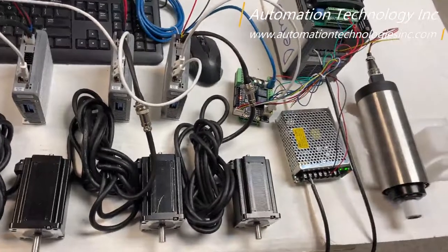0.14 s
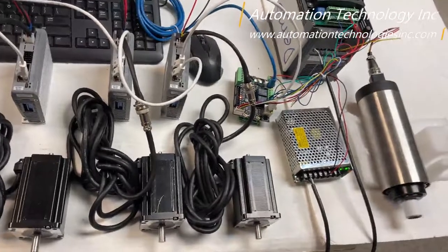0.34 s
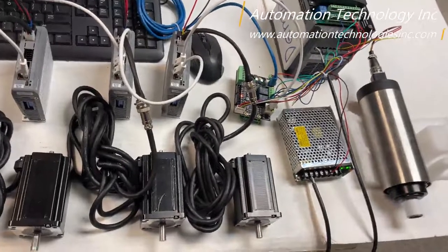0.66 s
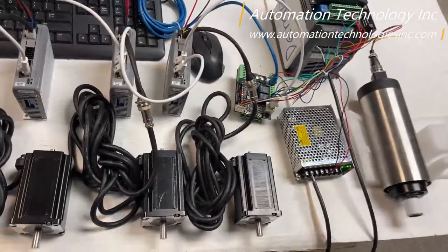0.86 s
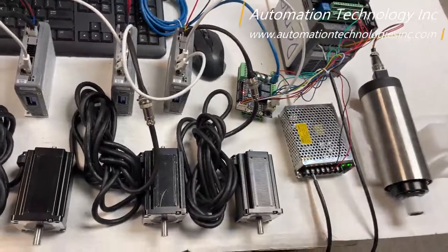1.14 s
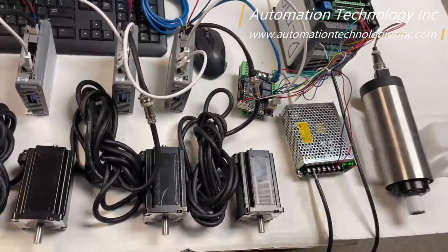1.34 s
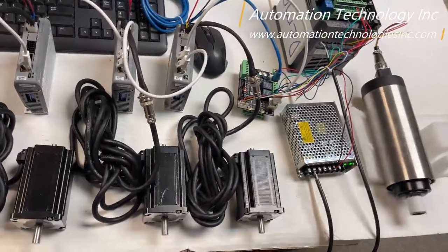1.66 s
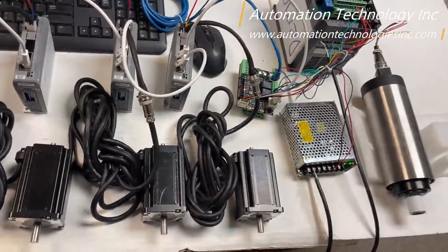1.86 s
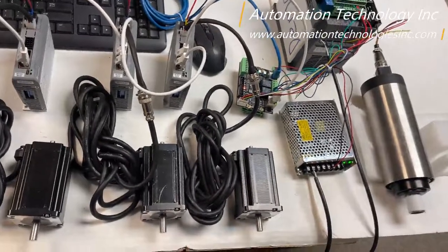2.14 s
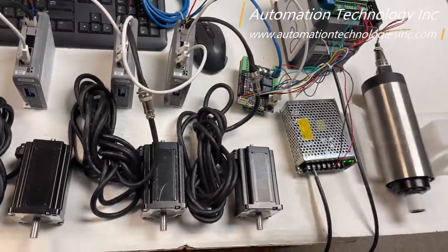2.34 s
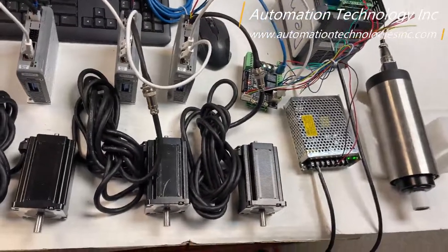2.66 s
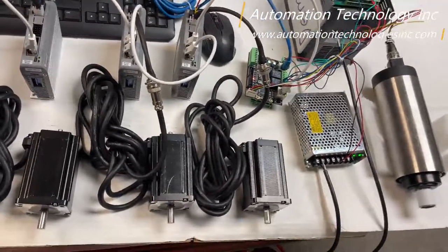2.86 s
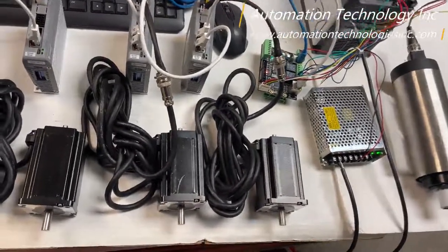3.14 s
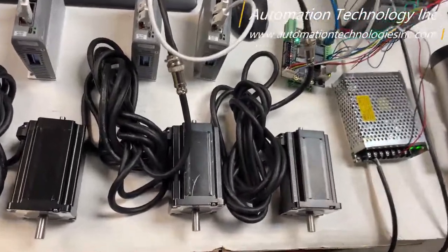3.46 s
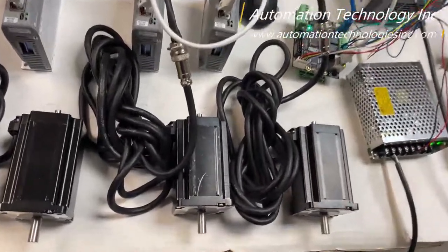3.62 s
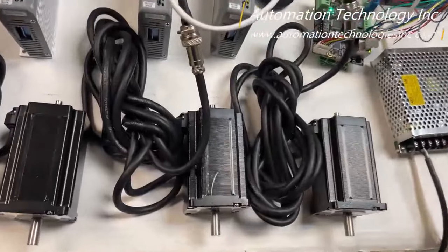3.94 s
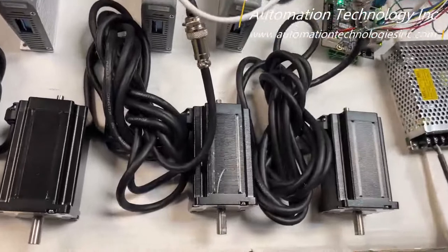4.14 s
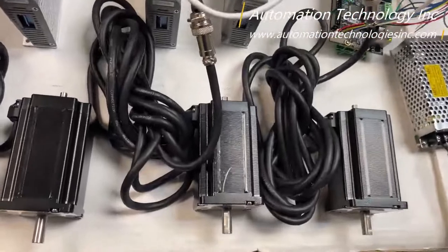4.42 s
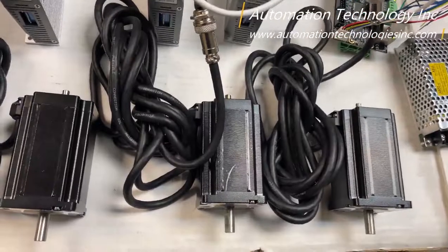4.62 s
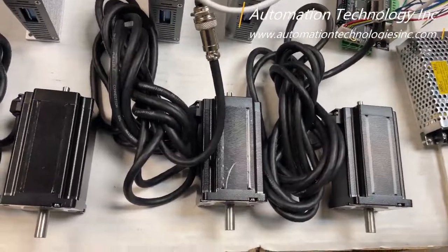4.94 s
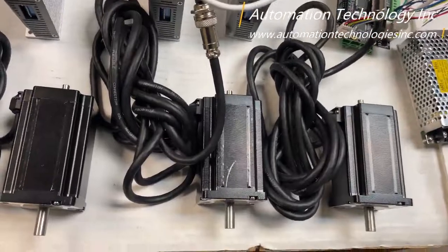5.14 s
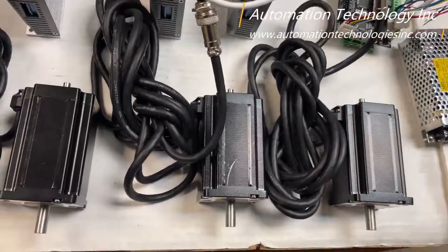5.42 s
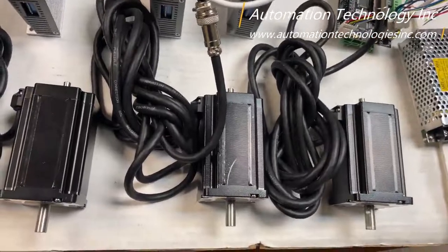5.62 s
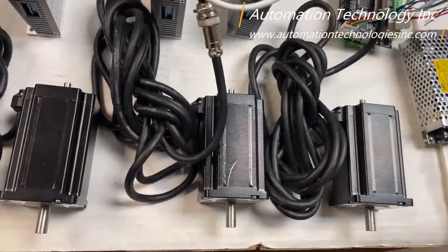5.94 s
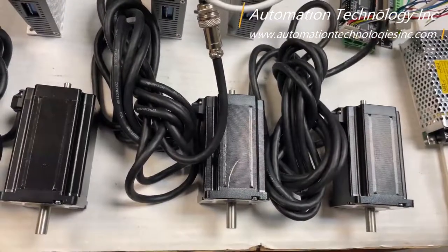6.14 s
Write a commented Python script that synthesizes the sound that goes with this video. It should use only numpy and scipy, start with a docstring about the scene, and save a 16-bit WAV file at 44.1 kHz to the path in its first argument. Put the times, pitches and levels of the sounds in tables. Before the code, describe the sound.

An air-cooled electric spindle motor on a workbench, heard indoors in stereo at close range. At 0 s it is already running fast and finishing its run-up: the hum climbs from about 234 to 254 hertz in roughly half a second, bulging near 0.25 s and shifting from right to left. The slightly raised level sinks and settles by 0.7 s. From there a strong, nearly pure hum around 255 hertz holds, with an octave and higher whine lines, notably near 1.8 kilohertz, fluttering slightly, plus broadband cooling air and fine bearing hiss. A very faint low drone enters around 2.1 s and wavers. From 3 to 4 s the microphone moves closer: the motor swells a little, and a bright vent hiss peaks near 3.7 s and fades. The hum then continues steadily, slightly fuller and more whiny, until it cuts off still running around 6.4 s.

```python
"""Spindle motor on a workbench

An air-cooled spindle motor finishes its run-up and holds about 15000 turns a minute.
Its unbalanced shaft hums through the bench as a sine at the shaft speed; whole multiples of that speed whine.
Blurred sines are the bearings, shaped noise is the cooling air, and a low drone and mains hum stay faint.
A little past halfway the microphone moves closer, which shifts levels, balance and colour."""
import sys
import numpy as np
from scipy import signal
from scipy.fft import rfft, irfft
from scipy.io import wavfile

SR = 44100
rng = np.random.default_rng(int(sys.argv[2]) if len(sys.argv) > 2 else 0)


def persist_wave(psi):
    """Save psi, clipped to +-1, as 16-bit WAV."""
    counts = np.round(np.clip(psi, -1, 1) * 32767).astype(np.int16)
    wavfile.write(sys.argv[1], SR, np.atleast_2d(counts).T)


N = 276948
TIME = np.arange(N) / SR                # s
BIN_HZ = np.arange(N // 2 + 1) * SR / N
SIDE = np.array([[.5], [-.5]])          # left and right port each take half of a difference

START_SPEED, RAMP_PER_S = 233.5, 58.5   # turns/s, turns/s per s
TOP_SPEED, KNEE = 255.1, 2.7            # turns/s: final speed, softness of the levelling off
CREEP, CREEP_S = 1.2, 2.4               # turns/s still missing at the start, time constant in s


def shaft_speed():
    """Ramp and saturation: a steady run-up levels off, then creeps up as the bearings warm (turns/s)."""
    running = TOP_SPEED - CREEP * np.exp(-TIME / CREEP_S)
    ramp = START_SPEED + RAMP_PER_S * TIME
    return running - KNEE * np.logaddexp(0, (running - ramp) / KNEE)   # soft minimum of the two


HUM_DB_PER_SPEED = 0.26                 # growth for each turn/s
CLOSEST_HUM_DB = 2
# the run-up sweeps through a bench resonance, which builds, dies away and shifts the hum right to left
SHAKE_S, SHAKE_BUILD_S, SHAKE_DECAY_S, SHAKE_DB = 0.24, 0.093, 0.17, 4.5
START_PAN_DB, SHIFT_S, SHIFT_TAKES_S = -4.5, 0.32, 0.37


def hum(shaft, speed, near, closest, waver_db=0.11):
    """Unbalance excitation: the shaft shakes the bench once a turn, harder as the speed grows."""
    level_db = blend(-13.5, -12, near)
    settled_pan_db = blend(5.7, 3.5, near)
    lead = blend(0.22, -0.35, near)     # rad
    level_db = level_db + HUM_DB_PER_SPEED * (speed - TOP_SPEED) + CLOSEST_HUM_DB * closest
    level_db = level_db + SHAKE_DB * swell(SHAKE_S, SHAKE_BUILD_S, SHAKE_DECAY_S)
    pan_db = blend(START_PAN_DB, settled_pan_db, ease(SHIFT_S, SHIFT_TAKES_S))
    return tone(shaft, level_db + waver_db * drift(9), pan_db, lead)


# whine lines at the far and the near spot, before resonance and flutter:
# [multiple of shaft speed, level/dB, left-right/dB, left lead/rad]
WHINE_FAR_LINES = [(2, -23, -1, -1.48), (3, -40.5, 2.5, 1.36), (4, -33, 2.5, -0.94), (5, -58, 10, -1.7),
                   (6, -47, 6, -1), (7, -35, 8, -1.46), (14, -50.5, -6.5, -1.4), (16, -64, -1, 0)]
WHINE_NEAR_LINES = [(2, -23.5, 0, -2.5), (3, -34.5, 4.5, -2), (4, -37.5, -7, -1.5), (5, -49.5, 0, 1.5),
                    (6, -42.5, 0.5, -2.5), (7, -30.5, 0.5, -2.5), (14, -48, -6.5, -4), (16, -63, -1, -2)]
# resonances and dips of housing and bench that the whine sweeps through: [f/Hz, width/Hz, level change/dB]
HOUSING_RESONANCES = [(471, 9.1, 2.5), (486, 5, 3), (721, 23, 10.5), (737, 12, 6), (970.7, 63, -14.5),
                      (1630, 26, 1), (1720, 71, 10.5)]
# on the way in the microphone crosses a loud spot of one whine line
SPOT_ORDER, SPOT_S, SPOT_WIDTH_S, SPOT_DB = 3, 3.36, 0.4, 3.5


def whine(shaft, speed, near, flutter_db=0.24, flutter_rate=9, twist=.007):
    """Harmonic series: lines at multiples of the shaft speed, the seventh being the blade passing rate."""
    out = np.zeros((2, N))
    shaft = shaft + twist * drift(12)   # the rotor never turns quite evenly (rad)
    for far_row, near_row in zip(WHINE_FAR_LINES, WHINE_NEAR_LINES):
        order = round(far_row[0])
        level_db, pan_db, lead = [blend(a, b, near) for a, b in zip(far_row[1:], near_row[1:])]
        for hz, width, peak_db in HOUSING_RESONANCES:
            detuning = 2 * (order * speed - hz) / width
            level_db = level_db + peak_db * np.exp(-detuning ** 2)
        if order == SPOT_ORDER:
            level_db = level_db + SPOT_DB * swell(SPOT_S, SPOT_WIDTH_S, SPOT_WIDTH_S)
        # higher lines flutter more, up to the tenth multiple
        level_db = level_db + flutter_db * min(order, 10) * drift(flutter_rate)
        start_angle = rng.uniform(0, 2 * np.pi)
        out += tone(order * shaft + start_angle, level_db, pan_db, lead)
    return out


# thin bearing tones between the harmonics, before flutter:
# [multiple of shaft speed, level/dB, left-right/dB, left lead/rad]
BEARING_TONES = [(20.86, -56, -1, -3.3), (34.79, -56.5, -7, -2), (38.15, -59, -6, -4.8)]


def bearings(shaft, flutter_db=4.0):
    """Phase modulation: the balls slip a little, which blurs their tones."""
    out = np.zeros((2, N))
    for multiple, level_db, pan_db, lead in BEARING_TONES:
        slipping = multiple * shaft + .5 * drift(8)
        out += tone(slipping, level_db + flutter_db * drift(12), pan_db, lead)
    return out


# rush of the cooling air, then hiss of vents and bearings, each at the far and the near spot:
# [f/Hz, level/dB per Hz, left-right/dB, likeness of the ports 0-1, left lead/rad]
AIR_RUSH_FAR = [(25, -88, 1.1, 0.67, 0), (50, -81, -1, 0.75, -1), (75, -73, 0, 0.96, 0.5),
                (110, -73.5, -6, 1, 0), (193, -65, 4, 0.55, 1), (305, -66.5, 11.5, 0.3, 1),
                (404, -61, -7, 0.98, 2.5), (620, -65.5, 1, 0.7, -2.5), (730, -62, 0.8, 0.76, 1),
                (924, -64, -5, 0.75, -2), (1220, -61.5, 1.5, 0.72, -0.5), (1830, -62.5, -1, 0.74, -1.67),
                (2430, -65, 4, 0.36, -2), (2800, -68.5, -2, 0.67, -2.5)]
AIR_RUSH_NEAR = [(25, -86, 6, 0.71, 2), (50, -83, -2, 0.65, 0), (75.4, -71.5, 0, 1, -0.5),
                 (110, -75, -0.2, 1, -1.5), (197, -66, 0, 0.61, 1.5), (306, -63.5, 3, 0.18, -10.5),
                 (370, -68, -5.5, 0.52, 12.3), (590, -65, -2, 0.47, -4), (756, -59, 6.5, 0.96, -1.0),
                 (907, -65.5, -3.5, 0.94, -1.5), (1260, -64.5, -0.5, 0.49, -2),
                 (1790, -65, 3.5, 0.85, -2.5), (2460, -67, 0.5, 0.16, -5.5), (2930, -75, -2, 0.1, -3)]
VENT_HISS_FAR = [(3200,-72,0.5,.97,-3.14), (4100,-68.5,-4,0.25,-3.8), (4550,-72,-2,0.5,-5.4),
                 (5160,-72,-0.5,0.9,-3.14), (5800,-67,-4,0.45,-2.2), (6400,-70,1.5,0.42,-1.6),
                 (7200,-75,1.6,0.5,-1.2), (8100,-78,-1.1,0.7,-3.2), (9200,-74,-12,0.5,-4.3),
                 (10200,-77,-9,0.5,-5.6), (11200,-79,0,.9,-6.2), (12300,-79.5,0,0.9,-6.4),
                 (13500,-81,0.5,0.5,-8.2), (14200,-81.5,0,1,-9.42)]
VENT_HISS_NEAR = [(3200,-74.5,-2,0.55,2.4), (4100,-70,-3,0.64,0.4), (4550,-71.3,-1.5,0.88,0),
                  (5270,-70,-3.5,0.6,2.7), (5830,-68.1,-3.5,0.39,2.2), (6400,-68,0.9,0.8,-0.3),
                  (7160,-76,7,0.35,-1), (8150,-79,3,0.62,-2.7), (9200,-75,-11,0.42,-4.3),
                  (10150,-75.7,-8.5,0.5,-5.5), (11200,-81.5,0,0.95,-6.3), (12300,-85,0,0.9,-6.4),
                  (13500,-89.5,0.2,0.3,-8.2), (14200,-86,0,1,-9.42)]


def air(shaft, near, throb=0.09):
    """Turbulent flow noise: broadband air from the vents, amplitude-modulated once a turn."""
    from_far = stereo_noise(list(AIR_RUSH_FAR) + list(VENT_HISS_FAR))
    from_near = stereo_noise(list(AIR_RUSH_NEAR) + list(VENT_HISS_NEAR))
    flow = np.sqrt(1 - near) * from_far + np.sqrt(near) * from_near   # equal-power crossfade
    return flow * (1 + throb * np.sin(shaft))


# narrow jet of one vent at its loudest:
# [f/Hz, level/dB per Hz, left-right/dB, likeness of the ports 0-1, left lead/rad]
VENT_JET = [(2500, -108, 3, .5, 0), (4200, -74, 4, .6, 0), (5240, -87, 5, 0.2, 1.5),
            (6500, -70, 7, 0.4, 0.34), (7500, -79, 3, 0.4, -1.2), (10000, -95, 0, .5, -2),
            (14000, -115, 0, .5, -2)]


def jet(crossing_s=3.68, width_s=0.39):
    """Directivity: a bright hiss swells and fades as the microphone crosses the beam of a vent."""
    return stereo_noise(VENT_JET) * np.exp(-((TIME - crossing_s) / width_s) ** 2)


# low drone, before its onset and pitch waver: [t/s, f/Hz, fundamental level/dB, octave level/dB]
DRONE_CURVE = [(2.2, 75.5, -54, -58), (2.9, 79.9, -52, -53.5), (3.4, 75.5, -54.5, -59),
               (3.75, 72, -52.5, -48), (4.25, 69.8, -63, -56), (5.2, 69.5, -63, -58),
               (5.65, 71.4, -54.5, -48.5), (5.95, 71.4, -57, -48), (6.15, 72, -63, -64)]
DRONE_ENTERS_S, DRONE_ATTACK_S = 2.13, 0.08


def drone(waver_hz=.6):
    """Frequency modulation: a faint low tone and its octave set in and waver in the room."""
    hz, low_db, octave_db = in_time(DRONE_CURVE)
    angle = angle_of(hz + waver_hz * drift(4.7))
    both = tone(angle, low_db, 0, 0) + tone(2 * angle, octave_db, 0, 0)
    return both * ease(DRONE_ENTERS_S, DRONE_ATTACK_S)


MAINS_HZ, MAINS_DB = 300, -53


def mains():
    """Mains harmonic: the power supplies hum faintly at a multiple of the mains rate."""
    return tone(angle_of(np.full(N, MAINS_HZ)), MAINS_DB, 0, 0)


START_EXTRA_DB, SINK_DB_PER_S, SETTLE_S, SETTLE_TAKES_S = 3.0, 3.5, 0.71, 0.04


def settling_db():
    """Level settling: the level starts 3 dB high, sinks steadily, then drops its last bit at once."""
    return (START_EXTRA_DB - SINK_DB_PER_S * TIME) * (1 - ease(SETTLE_S, SETTLE_TAKES_S))


def tone(angle, level_db, pan_db, lead):
    """Interaural cues: a sine of given RMS level differs in strength and phase between two ports."""
    return np.sqrt(2) * from_db(level_db + SIDE * pan_db) * np.sin(angle + SIDE * lead)


def stereo_noise(table):
    """Partial coherence: shaped noise mixes a part shared by both ports with a part of each alone."""
    points, *columns = np.transpose(table)
    level_db, pan_db, alike, lead = [np.interp(np.log(BIN_HZ + 1), np.log(points), c) for c in columns]
    alike = np.clip(alike, 0, 1)
    direct = rfft(rng.standard_normal(N))
    diffuse = rfft(rng.standard_normal((2, N)))
    both = np.sqrt(alike) * direct * np.exp(1j * SIDE * lead) + np.sqrt(1 - alike) * diffuse
    # white noise spreads its power over SR / 2, so this makes the levels dB per Hz
    return irfft(both * from_db(level_db + SIDE * pan_db), N) * np.sqrt(SR / 2)


def drift(rate):
    """Low-pass noise: a smooth random curve of spread 1 that changes about rate times a second."""
    slow = irfft(rfft(rng.standard_normal(N)) / (1 + (BIN_HZ / rate) ** 4), N)
    return slow / slow.std()


def angle_of(hz):
    """Phase integration: running angle in rad of something that turns hz times a second."""
    return 2 * np.pi * np.cumsum(hz) / SR


def from_db(db):
    """Logarithmic level: decibels to amplitude gain."""
    return 10 ** (np.asarray(db) / 20)


def in_time(rows):
    """Linear interpolation: each column of a curve at every sample."""
    s, *columns = np.transpose(rows)
    return [np.interp(TIME, s, c) for c in columns]


def blend(start, end, share):
    """Linear interpolation: from start to end as share goes from 0 to 1."""
    return start + share * (end - start)


def ease(middle_s, takes_s):
    """Sigmoid transition: a smooth step from 0 to 1, mostly within takes_s."""
    return .5 + .5 * np.tanh(2 * (TIME - middle_s) / takes_s)


def swell(peak_s, rise_s, decay_s):
    """Build-up and decay: a rounded rise to 1, then an exponential fall."""
    since = TIME - peak_s
    return np.exp(-np.where(since < 0, (since / rise_s) ** 2, since / decay_s))


# the microphone moves in once, and passes closest to the motor just before it comes to rest
MOVE_S, MOVE_TAKES_S = 3.4, 0.8
CLOSEST_S, CLOSING_S, LEAVING_S, CLOSEST_MOTOR_DB = 3.69, 0.44, 0.46, 1.5
AIR_TURNS_S = 3.49   # the air takes on its near colour a little later


def scene():
    """Superposition: one shaft drives hum, whine, bearings and air; the microphone's place colours them."""
    speed = shaft_speed()
    shaft = angle_of(speed)
    near = ease(MOVE_S, MOVE_TAKES_S)
    air_near = ease(AIR_TURNS_S, MOVE_TAKES_S)
    closest = swell(CLOSEST_S, CLOSING_S, LEAVING_S)
    motor = whine(shaft, speed, near) + bearings(shaft) + air(shaft, air_near)
    motor = from_db(CLOSEST_MOTOR_DB * closest) * motor
    settled = from_db(settling_db()) * (hum(shaft, speed, near, closest) + motor)
    return settled + jet() + drone() + mains()


CUTOFF_HZ = 15750


def record(dry):
    """Band limiting: an elliptic low-pass cuts the top steeply."""
    lowpass = signal.ellip(12, .1, 90, CUTOFF_HZ, fs=SR, output="sos")   # order, ripple dB, stop dB
    return signal.sosfilt(lowpass, dry)


dry = scene()
out = record(dry)
persist_wave(out)
```